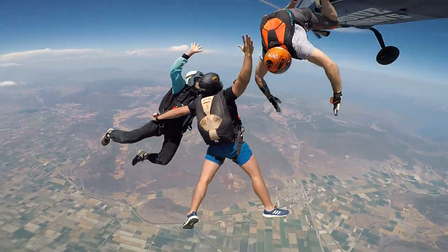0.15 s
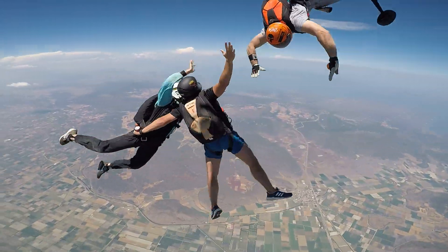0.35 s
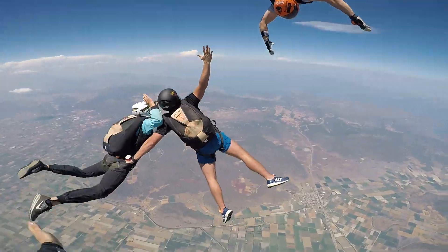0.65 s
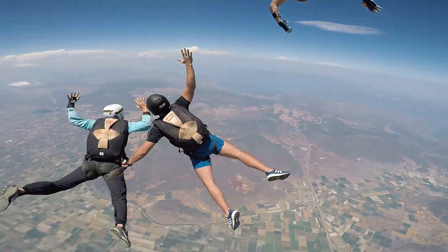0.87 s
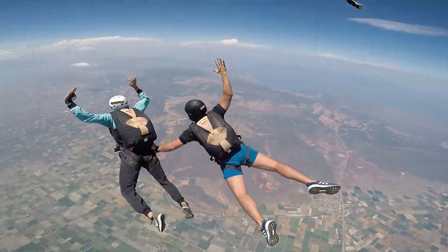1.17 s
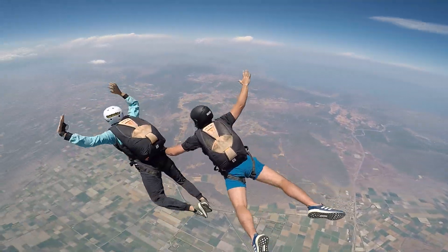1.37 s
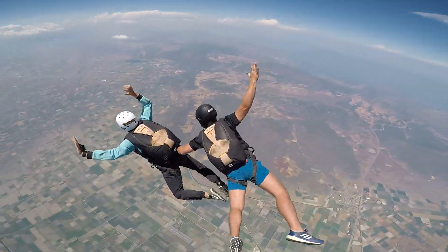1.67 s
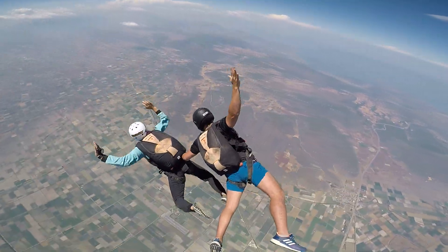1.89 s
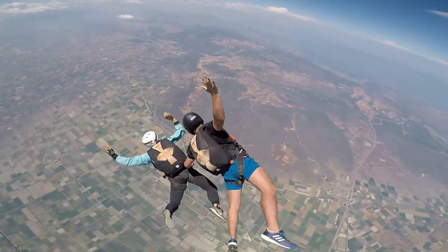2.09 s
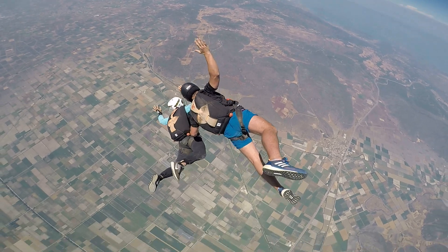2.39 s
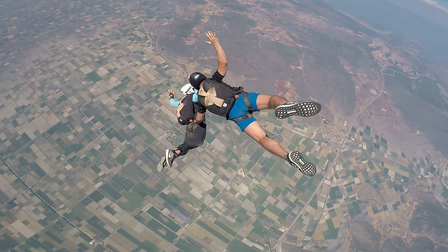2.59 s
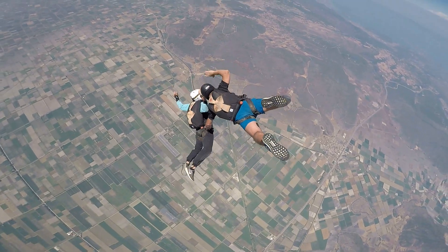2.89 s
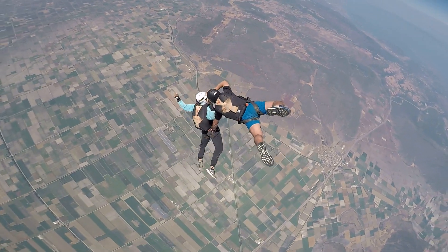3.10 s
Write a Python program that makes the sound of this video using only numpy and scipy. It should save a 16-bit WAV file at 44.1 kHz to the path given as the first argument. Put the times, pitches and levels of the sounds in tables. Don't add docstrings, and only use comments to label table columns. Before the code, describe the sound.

Close, harsh freefall wind at a wearable camera: deep rumble and gusty roar, airy whistles sliding in pitch, a sharp drop late on, then wind slams back with low pounding against the housing.

```python
import sys
import numpy as np
from scipy import signal
from scipy.fft import rfft, irfft, next_fast_len
from scipy.io import wavfile
from scipy.ndimage import uniform_filter1d, map_coordinates

SR = 44100
rng = np.random.default_rng(int(sys.argv[2]) if len(sys.argv) > 2 else 0)


def wav_out(sig):
    wavfile.write(sys.argv[1], SR, np.round(np.clip(np.atleast_2d(sig).T, -1, 1) * 32767).astype(np.int16))


def decibels_to_gain(level_db):
    exponent = np.asarray(level_db, float) / 20
    return 10 ** exponent


N = 143325

# start_s, level_db
SHELTER_LEVEL = [(0, -56), (.3, -42), (1, -41.5), (1.15, -46.5), (1.8, -52), (2.0, -44), (2.3, -41.5),
                 (2.45, -42), (3.25, -40)]
# frequency_hz, level_db
HISS_SPECTRUM = [(2500, -17), (5000, -6), (6500, -1.5), (8000, -4), (10000, -14.5), (13000, -44)]
# start_s, level_db, own_db (small eddies of each side)
EDDY_LEVEL = [(0, -20, -5), (.12, -16.5, -0.5), (.2, -12.5, -2.5), (.34, -14.5, -2), (.42, -26.5, 1.5),
              (.8, -25, 2), (.95, -25.5, 4), (1.13, -24, 6), (1.2, -26.5, 0), (1.5, -31, -1),
              (1.78, -27, -0.5), (1.85, -29, -1.5), (2.3, -23, -3), (2.53, -24, 0), (2.57, -19, -3.5),
              (2.89, -14, 2), (2.92, -23, 1.5), (3.25, -23.5, 1)]
# frequency_hz, level_db
RUMBLE_SPECTRUM = [(15, -8), (30, -2.5), (70, -1.5), (130, -2.5), (220, -5.5), (400, -15.5), (900, -25.5)]
# frequency_hz, level_db
OWN_SPECTRUM = [(15, -8), (40, -8), (100, -2.5), (170, -1), (280, -9.5), (500, -19), (1500, -36.5),
                (4000, -35)]
# start_s, peak_db
EDDY_THUMPS = [(2.014, -22.5), (2.095, -24), (2.554, -9.5), (2.597, -13), (2.669, -8.5), (2.961, -11),
               (3.004, -12.5), (3.08, -9), (3.118, -14), (3.22, -11)]
# leave_s, return_s, first_fall_db, last_fall_db
HEAD_TURN = (1.804, 2.326, 21, 13.7)
# start_s, pitch_hz, level_db
WHISTLE_TRACKS = [
    [(.37, 2000, -32), (.44, 2050, -23), (.47, 1900, -26), (.5, 1720, -19), (.56, 1450, -24),
     (.63, 1250, -26), (.74, 1050, -28), (.85, 950, -28)],
    [(1.03, 1743, -17), (1.09, 2033, -14.5), (1.19, 2052, -15.5), (1.25, 2226, -12.5), (1.295, 1940, -15),
     (1.33, 2180, -15.5), (1.5, 2230, -22), (1.63, 1877, -14.5), (1.7, 1770, -16)],
    [(1.695, 1836, -14), (1.735, 1620, -13), (1.757, 1780, -19)],
    [(1.77, 1700, -9), (1.8, 1400, -28)],
    [(2.322, 1150, -15), (2.336, 1550, -23), (2.352, 1790, -4.5), (2.362, 1950, -17)],
    [(2.36, 700, -27), (2.45, 1000, -15), (2.58, 1300, -25)],
    [(2.95, 2100, -34), (3.0, 2200, -19.5), (3.05, 2150, -20), (3.075, 2110, -23), (3.1, 1950, -19)],
    [(3.16, 1950, -22), (3.18, 2250, -15.5), (3.195, 1950, -20), (3.25, 2200, -23)],
]
WHISTLE_WIDTHS = [380, 381.4, 109.3, 500, 150, 458, 382, 260]
# start_s, level_db, bright_db
FLOW_LEVEL = [(0, -34, -8), (.09, -24.5, -17), (.27, -28, -3), (.43, -23, 3), (.53, -24.5, -9.5),
              (.68, -25.5, -12), (.82, -27.5, -16), (.96, -21.5, -10), (1.12, -25.5, 0),
              (1.35, -25.5, -0.5), (1.52, -26, 3.5), (1.8, -26, -8.5), (2.32, -22, -4.5), (2.45, -29, 6.5),
              (2.6, -24, -1.5), (2.8, -24.5, -3.5), (2.95, -26.5, 3), (3.25, -25.5, 1.5)]
# middle_s, length_s (half-width of the bell), depth_db
FLOW_GAPS = [(0.007, 0.011, 10.5), (.052, 0.017, 19.5), (0.074, 0.0058, -11.5), (0.102, 0.012, 18),
             (0.162, 0.0052, 11), (0.188, 0.0085, 8), (.205, 0.0066, -4), (0.226, 0.0072, 5),
             (0.277, 0.0041, -0.5), (0.597, 0.0053, -5), (0.705, 0.031, -3.5), (1.754, .007, 2),
             (2.017, 0.0025, -8.5), (2.09, 0.016, -4), (2.605, 0.019, 4), (2.646, 0.019, 4),
             (2.684, 0.014, 3.5), (2.782, 0.02, 5.5), (2.857, 0.012, 1.5), (3.15, 0.029, 3)]
# frequency_hz, level_db
BODY_SPECTRUM = [(120, -30), (250, -3), (450, 0), (1000, -0.5), (1600, -5.5), (2600, -16), (4500, -35),
                 (8000, -58)]
# frequency_hz, level_db
FIZZ_SPECTRUM = [(1200, -13), (2200, 1), (3500, -0.5), (5500, -3.5), (7000, -7), (8000, -18), (10500, -30),
                 (13000, -67)]
# frequency_hz, level_db
RIGHT_PATH = [(150, -8), (300, -9), (520, -6.5), (900, -1), (1300, -.2), (3300, -0.1), (4300, -9),
              (5000, -36)]


def unit(x):
    return x / np.sqrt(np.mean(np.abs(x) ** 2) + 1e-20)


def curves(rows):
    s, *cols = np.transpose(rows)
    return [np.interp(np.arange(N) / SR, s, c) for c in cols]


def wobble(rate):
    return map_coordinates(rng.standard_normal(4000), [np.arange(N) * rate / SR])


def filtered(x, points, turn=0, lag_s=0):
    m = next_fast_len(N + 8192)
    hz = np.fft.rfftfreq(m, 1 / SR)
    f, db = np.transpose(points)
    gain = decibels_to_gain(np.interp(np.log(hz + 1), np.log(f), db, left=-120, right=-120))
    phase = turn - 2 * np.pi * hz * lag_s
    return irfft(rfft(x, m) * gain * np.exp(1j * phase), m)[:N]


def rush(points, patchy_db):
    z = signal.stft(rng.standard_normal(N), nperseg=256)[2]
    field = uniform_filter1d(rng.standard_normal(z.shape), size=6, axis=0)
    field = uniform_filter1d(field, size=8, axis=1)
    patchy = signal.istft(z * decibels_to_gain(patchy_db * unit(field)), nperseg=256)[1][:N]
    return unit(filtered(patchy, points))


def sheltered_hiss():
    level_db, = curves(SHELTER_LEVEL)
    return decibels_to_gain(level_db + 1.35 * wobble(20)) * rush(HISS_SPECTRUM, patchy_db=1.1)


def eddy_thumps():
    thump_hz, rise_s, gain_db = 75, .006, 2
    t, hits = np.arange(N) / SR, np.zeros(N)
    for start_s, peak_db in EDDY_THUMPS:
        u = np.clip(t - start_s, 0, 1) / rise_s
        envelope = decibels_to_gain(peak_db + gain_db) * u * np.exp(1 - u)
        pitch_hz = thump_hz * rng.uniform(0.7, 1.5)
        hits -= envelope * np.sin(2 * np.pi * pitch_hz * (t - start_s))
    return hits


def buffet():
    eddy_db, own_db = curves(EDDY_LEVEL)
    lumps = decibels_to_gain(eddy_db + 1 + .6 * wobble(40))
    shared = rush(RUMBLE_SPECTRUM, patchy_db=0.55)
    left = decibels_to_gain(own_db) * rush(OWN_SPECTRUM, patchy_db=1.0)
    right = decibels_to_gain(own_db) * rush(OWN_SPECTRUM, patchy_db=1.0)
    rumble = lumps * np.array([0.81 * shared + 0.83 * left, 0.65 * shared + 0.41 * right])
    return rumble + eddy_thumps() * decibels_to_gain([[1.2], [-1.2]])


def shadow_db(late_s):
    t, edge_s = np.arange(N) / SR, 0.0065
    leave, back, first_db, last_db = HEAD_TURN
    leaving = (t - leave) / edge_s
    returning = (back + late_s - t) / (edge_s + late_s)
    inside = np.clip(np.minimum(leaving, returning), 0, 1)
    return -inside * np.interp(t, [leave, back], [first_db, last_db])


def whistle():
    gain_db, wander, fade_s = 1.24, .025, .005
    t, out = np.arange(N) / SR, np.zeros(N)
    for rows, width_hz in zip(WHISTLE_TRACKS, WHISTLE_WIDTHS):
        hz, db = curves(rows)
        on = np.clip(np.minimum(t - rows[0][0], rows[-1][0] - t) / fade_s, 0, 1)
        swell = (.5 + wobble(width_hz) + 1j * wobble(width_hz)) / 1.4
        level = decibels_to_gain(db + 2.6 * wobble(39.96))
        phase = 2 * np.pi * np.cumsum(hz * (1 + wander * wobble(45))) / SR
        out += on * level * np.real(swell * np.exp(1j * phase))
    return decibels_to_gain(gain_db) * out


def roar():
    t = np.arange(N) / SR
    level_db, bright_db = curves(FLOW_LEVEL)
    eddy_db, _ = curves(EDDY_LEVEL)
    unrest = decibels_to_gain(.5 * (eddy_db - eddy_db.mean()))
    flutter_db = unrest * (0.13 * wobble(18) + 0.8 * wobble(70) + 1.42 * wobble(220))
    gap_db = sum(db * np.exp(-((t - s) / length) ** 2) for s, length, db in FLOW_GAPS)
    body_db = level_db + 9.5 + 0.95 * shadow_db(0) + 0.74 * flutter_db - 0.8 * gap_db
    fizz_db = level_db + bright_db + 4 + shadow_db(0.019) + 1.14 * flutter_db - 1.35 * gap_db
    body = decibels_to_gain(body_db) * rush(BODY_SPECTRUM, patchy_db=1.0)
    fizz = decibels_to_gain(fizz_db) * rush(FIZZ_SPECTRUM, patchy_db=-0.5)
    return body + fizz


def scene():
    port = roar() + whistle()
    right = filtered(port, RIGHT_PATH, turn=3.104, lag_s=.000093)
    right = right * (1 + .24 * wobble(900))
    return np.array([port, right]) + buffet() + sheltered_hiss() * decibels_to_gain([[-14], [0.1]])


def band_limit(x):
    return signal.sosfilt(signal.butter(12, 13400, fs=SR, output="sos"), x)


def record(dry):
    mix = dry / (1 + np.abs(dry / 0.94) ** 6) ** (1 / 6)
    return band_limit(mix)


dry = scene()
out = record(dry)
wav_out(out)
```